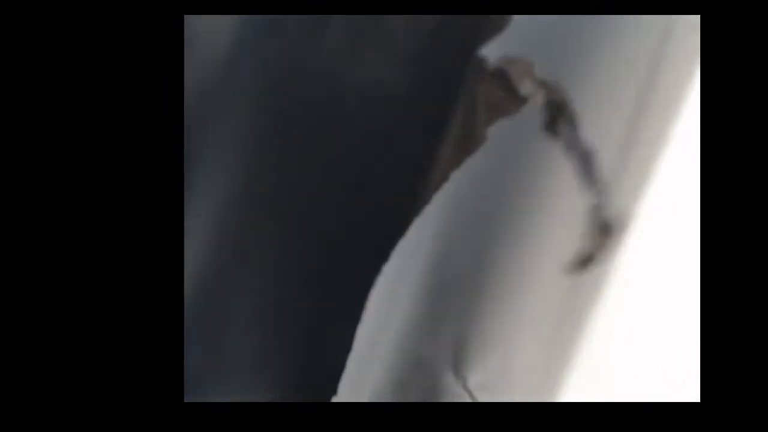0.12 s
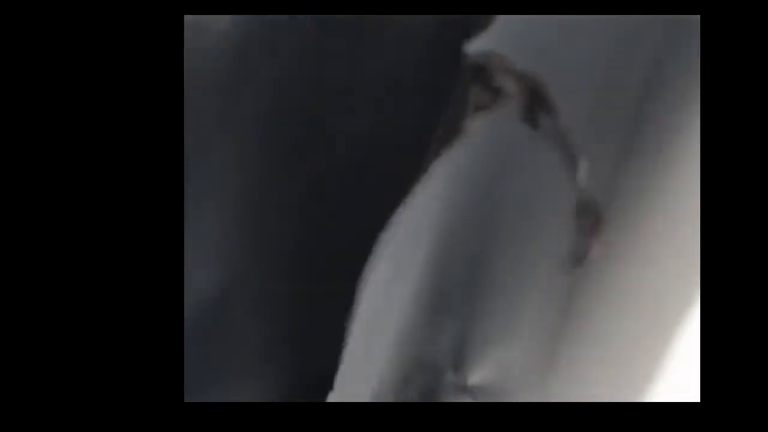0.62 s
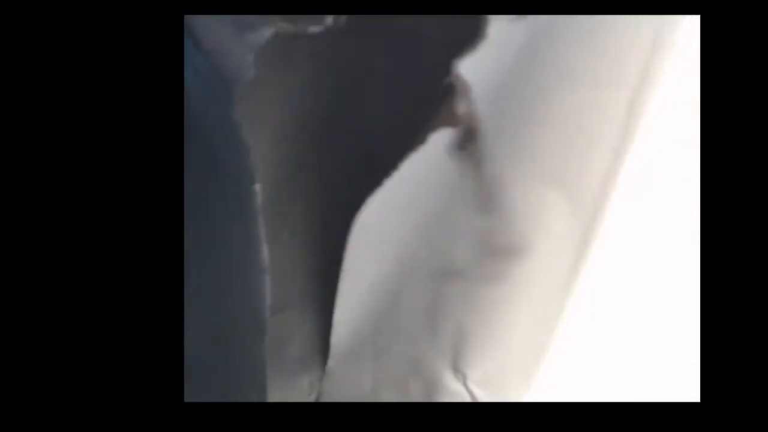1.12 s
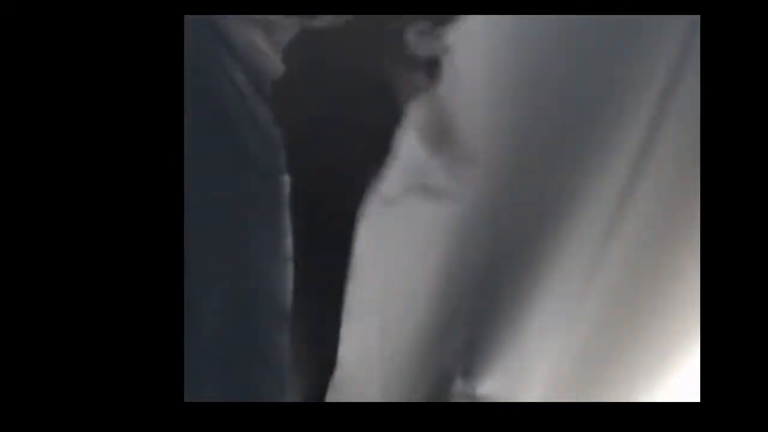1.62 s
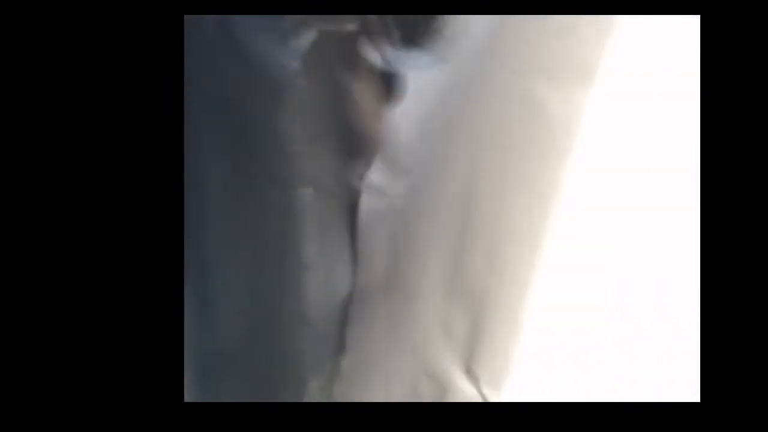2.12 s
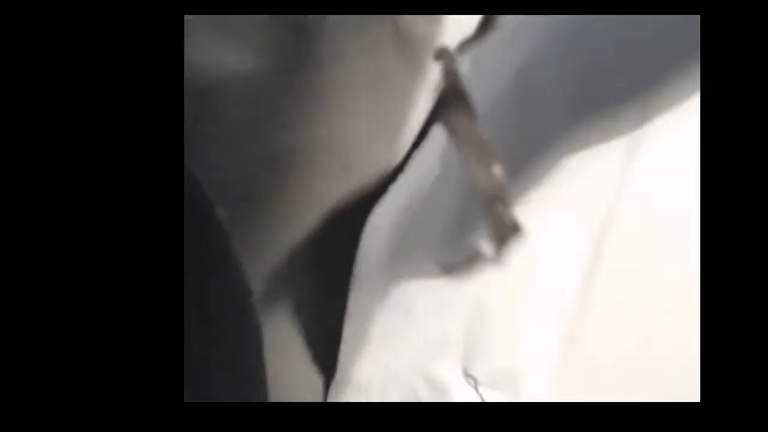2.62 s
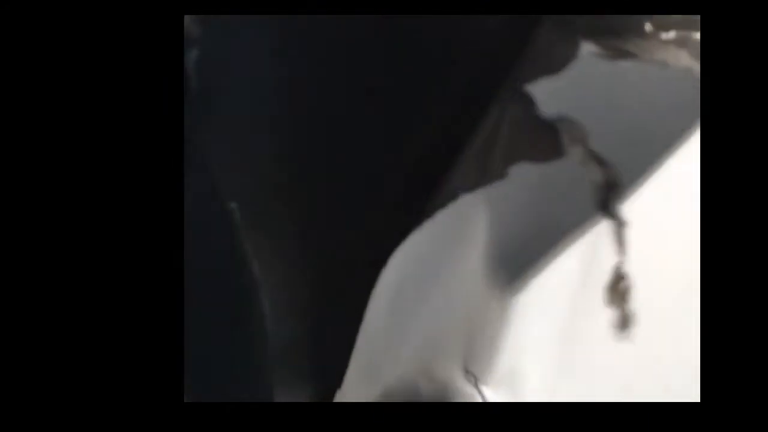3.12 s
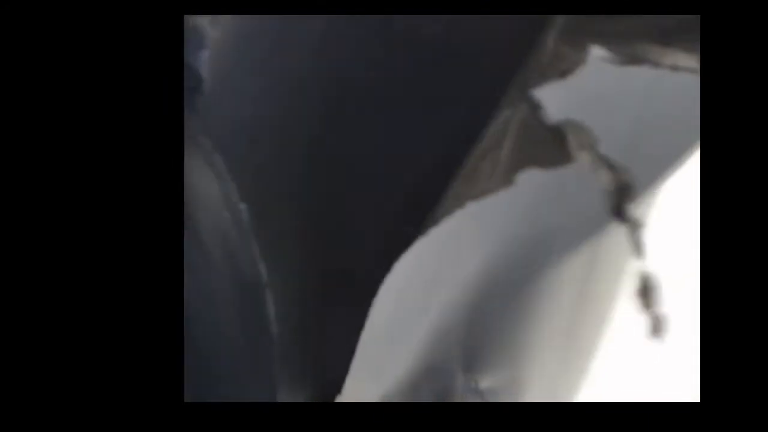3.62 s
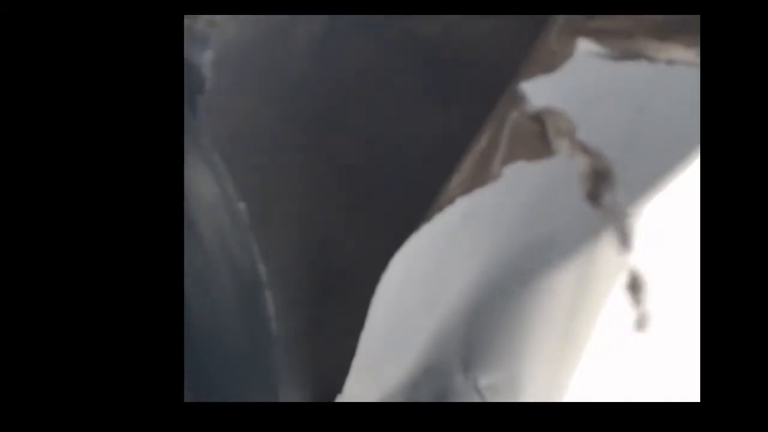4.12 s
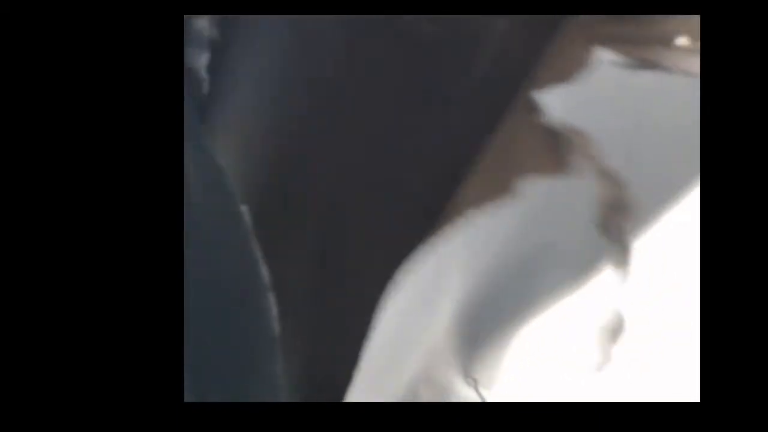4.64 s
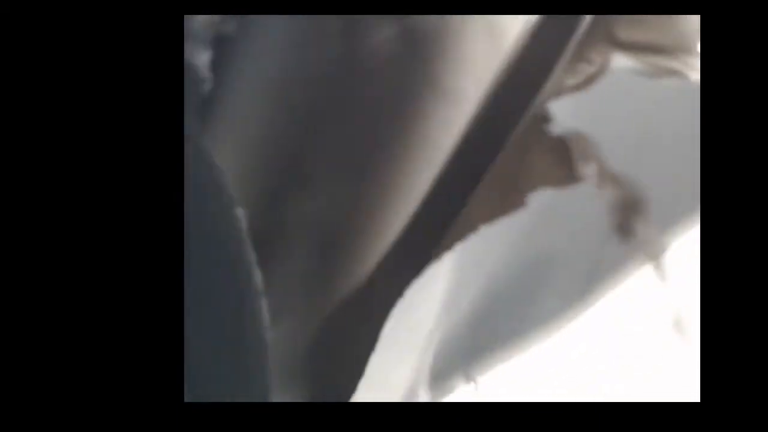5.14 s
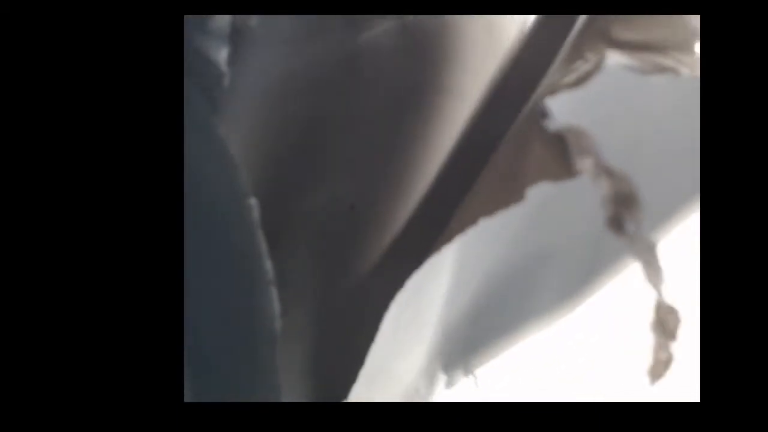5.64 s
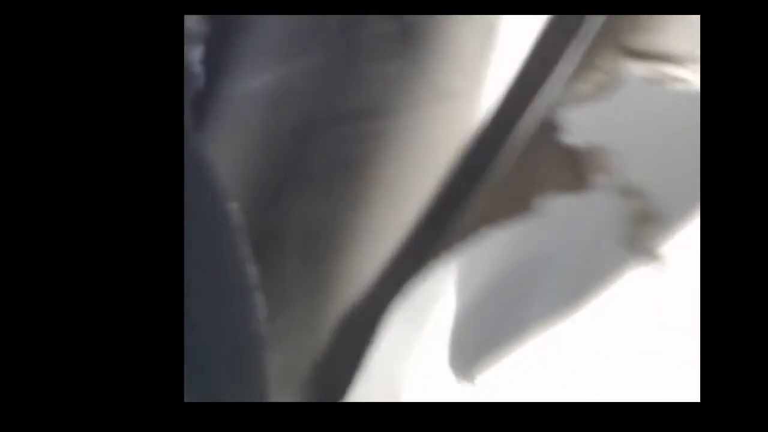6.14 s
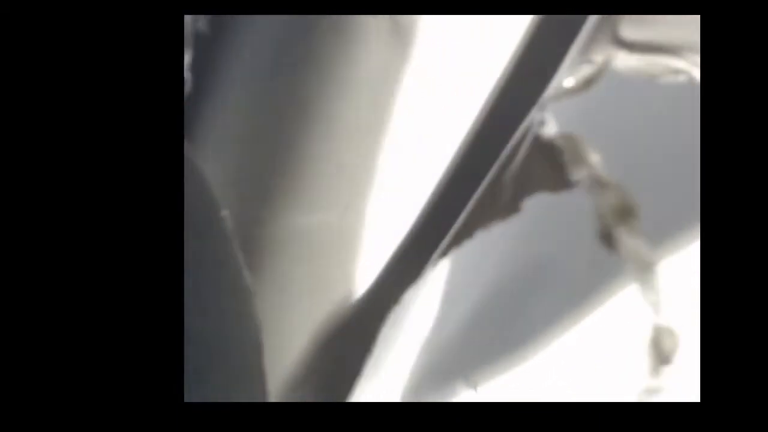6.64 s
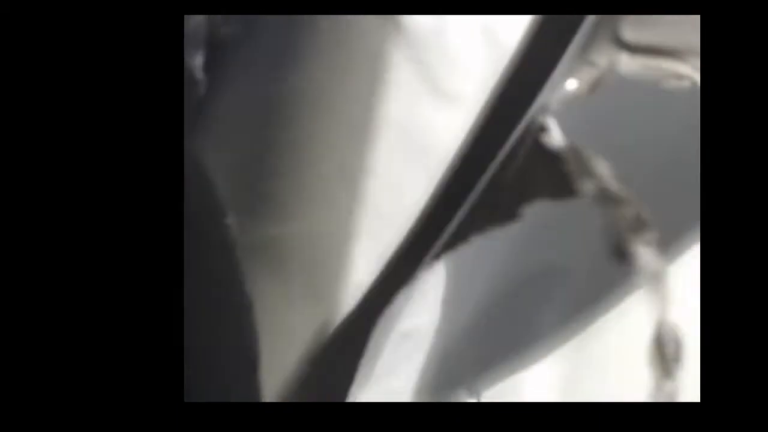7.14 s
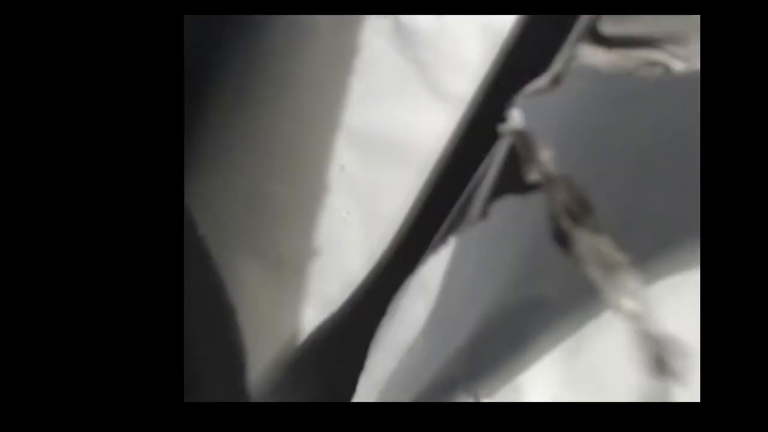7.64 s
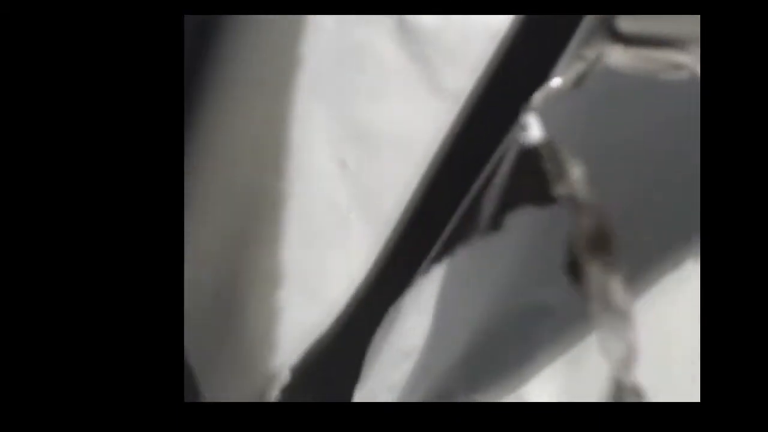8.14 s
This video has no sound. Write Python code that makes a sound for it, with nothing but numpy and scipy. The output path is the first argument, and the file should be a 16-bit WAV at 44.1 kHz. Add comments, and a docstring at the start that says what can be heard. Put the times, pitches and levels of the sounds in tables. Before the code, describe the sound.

A stiff paper parcel is ripped and crumpled up close, two violent cracking bursts, a near-quiet lull, then dense irregular crackles and hollow knocks.

```python
"""In a small room, hands tear and crumple a paper parcel, with a stereo microphone right at its opening.
Creases snap: each jolts the hollow parcel into a ringing boom and knock, and its fibres crack in the treble.
Many tiny snaps and a rub of sheet on sheet follow the grip of the hands.
Moving sheets and bumps push air at the microphone's two ports, and sparse fading taps make the echo.
The microphone dulls the top treble, and its input bends and cuts the loudest peaks."""
import sys
import numpy as np
from scipy import signal
from scipy.fft import rfft, irfft, next_fast_len
from scipy.io import wavfile
from scipy.ndimage import uniform_filter1d

SR = 44100
rng = np.random.default_rng(int(sys.argv[2]) if len(sys.argv) > 2 else 0)


def wav_out(sig):
    """Save sig, one row per channel (or a flat mono array), as 16-bit PCM at SR to the path in sys.argv[1]."""
    wavfile.write(sys.argv[1], SR, np.round(np.clip(np.atleast_2d(sig).T, -1, 1) * 32767).astype(np.int16))


def decibels_to_gain(level_db):
    """Convert a level in decibels to a linear amplitude gain (20 dB per decade)."""
    exponent = np.asarray(level_db, float) / 20
    return 10 ** exponent


N = 364266
RING_N = 2600  # samples kept of one snap or bump

# low ringing modes of the hollow parcel, before each crease retunes them: f/Hz, level/dB, time to fall 60 dB/s
BOOM = [(249, -3, 0.069), (314.5, 3.5, 0.022), (417, -13, 0.031)]
# higher ringing modes of the hollow parcel, before retuning: f/Hz, level/dB, time to fall 60 dB/s
KNOCK = [(480, -28.5, 0.0053), (853, -4, 0.014), (1005, 5.5, 0.015), (1736, 1.5, 0.012)]
# treble colour of breaking and rubbing paper fibres: f/Hz, level/dB
FIZZ = [(1500, -41), (2500, 2), (3200, -1), (4500, -3), (7200, -6)]


def evened(x):
    """Brings a signal to an average (rms) strength of 1."""
    return x / np.sqrt(np.mean(x ** 2) + 1e-20)


def read_curve(points, hz):
    """Reads a curve between its points, with frequency on a logarithmic scale."""
    f, value = np.transpose(points)
    return np.interp(np.log(hz + 1), np.log(f + 1), value)


def add_at(mix, s, sound):
    """Adds a sound to the mix from s seconds on, cut off at the end of the mix."""
    part = mix[:, round(s * SR):][:, :sound.shape[1]]
    part += sound[:, :part.shape[1]]


def coloured(x, points):
    """Filters each channel by a spectrum in dB."""
    n = x.shape[-1]
    size = next_fast_len(n)
    gain = decibels_to_gain(read_curve(points, np.fft.rfftfreq(size, 1 / SR)))
    return irfft(rfft(x, size) * gain, size)[..., :n]


def two_port_noise(same, size):
    """Noise for the two ports, alike by the share same (0 unrelated, 1 identical)."""
    a, b = rng.standard_normal((2, size))
    return np.array([a, same * a + np.sqrt(1 - same ** 2) * b])


def wander(depth_db, size):
    """A gain that drifts at random: noise smoothed over size samples, taken as dB."""
    return decibels_to_gain(depth_db * evened(uniform_filter1d(rng.standard_normal(N), size)))


def fading(t60, rise_s):
    """A quick rise, then a fall of 60 dB in t60 seconds."""
    t = np.arange(RING_N) / SR
    return decibels_to_gain(-60 * t / t60) * (1 - np.exp(-t / rise_s))


def swells(rows, floor, steep=1):
    """Gain of peaks that rise and fall evenly in dB, summed in power over a floor of (s, dB) points."""
    slope_db = 20  # rise and fall times count over this many dB when steep is 1
    t = np.arange(0, N / SR + .002, .001)  # one step a millisecond
    s, db, rise, fall = np.transpose(rows)[:, :, None]
    before = (s - t) / np.maximum(rise, .005)
    after = (t - s) / np.maximum(fall, .005)
    away = np.where(t < s, before, after)
    peaks = (decibels_to_gain(db - steep * slope_db * away) ** 2).sum(0)
    floor_db = np.interp(t, *np.transpose(floor))
    return np.interp(np.arange(N) / SR, t, np.sqrt(peaks + decibels_to_gain(floor_db) ** 2))


def room(x):
    """The small room: sparse taps of random sign, each band dying at its own speed."""
    # how long the echo lasts: f/Hz, time to fall 60 dB/s
    echo_times = [(250, 0.053), (1000, 0.11), (5000, 0.095)]
    taps = np.zeros((2, SR // 2))
    at = np.arange(120, SR // 2 - 20, 20)  # one tap in every 20 samples
    shape = (2, len(at))
    np.put_along_axis(taps, at + rng.integers(0, 20, shape), rng.choice([-1., 1.], shape), 1)
    hz, t, z = signal.stft(taps, SR, nperseg=256)
    fade = decibels_to_gain(-60 * t / read_curve(echo_times, hz)[:, None])
    tail = signal.istft(z * fade, SR, nperseg=256)[1]
    return signal.fftconvolve(x, tail / np.linalg.norm(tail[0]), axes=1)[:, :N]


def air():
    """Lumpy low pressure from sheets flexing by the ports, partly unrelated between them."""
    # colour of the pushed air: f/Hz, level/dB
    air_colour = [(15, 8.5), (40, 4), (220, -4.5), (400, -15), (700, -30.5)]
    # sheets flexing by the ports: peak t/s, pushed air level/dB, rise/s, fall/s
    puffs = [(.11, -35.5, 0.12, 0.1), (.619, -16.5, 0.11, 0.11), (1.636, -25.5, 0.19, 0.094),
             (1.836, -25.5, 0.06, 0.091), (2.12, -28.5, .07, 0.12), (2.584, -41.5, 0.13, 0.071),
             (3.557, -41.5, .6, 0.39), (4.465, -43.5, 0.038, 0.047), (4.92, -43, 1.4, 0.52),
             (5.647, -44.5, 0.2, 0.13), (5.892, -33, 0.1, 0.22), (6.54, -55, 0.13, .08),
             (6.695, -26, 0.018, 0.21), (7.468, -34.5, 1.65, 0.076), (7.608, -35, .05, 0.057),
             (7.712, -32, 0.066, 0.25), (8.087, -30, 0.11, 0.089), (8.256, -12.5, 0.011, 0.04)]
    still_air_db = -50
    lumps = wander(2.5, 1500)
    push = coloured(two_port_noise(.45, N), air_colour)
    return swells(puffs, [(0, still_air_db)]) * evened(push * lumps)


def bumps():
    """Hands bump the parcel: each bump sucks the air and lets it swing back, alike at both ports."""
    # bumps of the hands: t/s, peak level/dB
    bump_rows = [(0.698, -22), (1.775, -18), (1.83, -17), (1.845, -20), (1.856, -19), (2.063, -28),
                 (2.114, -19.5)]
    bump_hz, bump_t60_s = 139, 0.025
    out, t = np.zeros((2, N)), np.arange(RING_N) / SR
    push = -np.sin(2 * np.pi * bump_hz * t) * fading(bump_t60_s, 0.0014)
    push /= abs(push).max()
    for s, peak_db in bump_rows:
        add_at(out, s, decibels_to_gain(peak_db) * push[None])
    return out


def parcel(modes, spread):
    """The ring of the hollow parcel; every crease detunes and weights the modes in its own way."""
    t = np.arange(RING_N) / SR
    hz, db, t60 = np.transpose(modes)[:, :, None]
    tune, weight = rng.standard_normal((2, len(modes), 1))
    hz = hz * np.exp(spread * tune)
    db = db + 3.0 * weight
    return (decibels_to_gain(db - 60 * t / t60) * np.sin(2 * np.pi * hz * t)).sum(0)


def ring(modes, spread, t60, same):
    """A crease gives way in a ragged jolt a few milliseconds long that drives the parcel; peak 1."""
    jolt = two_port_noise(same, RING_N) * fading(t60, 0.00049)
    jolt -= uniform_filter1d(jolt, size=300, axis=1, mode="constant")  # no net push, so no deep bass
    sound = signal.fftconvolve(jolt, parcel(modes, spread)[None], axes=1)[:, :RING_N]
    return sound / abs(sound).max()


def crack(t60, same):
    """The fibres giving way: a short treble burst with its own colour, differing at the two ports; peak 1."""
    own_colour = [(hz, db + 3.0 * rng.standard_normal()) for hz, db in FIZZ]
    burst = coloured(two_port_noise(same, RING_N), own_colour) * fading(t60, 0.000081)
    return burst / abs(burst).max()


def grip(treble):
    """Level of the crumpling, or of its treble: squeezes over the steady hold."""
    # rips and squeezes: peak t/s, crumpling level/dB, rise/s, fall/s, treble over the crumpling/dB
    squeezes = [(0.116, -27, 0.063, 0.075, -0.5), (0.501, -19.5, 0.066, 0.2, -7),
                (0.62, -16.5, .2, 0.11, 1.5), (1.457, -32.5, 0.032, 0.55, 6),
                (1.621, -15, 0.035, 0.044, -0.5), (1.775, -38.5, 0.78, 0.18, -28),
                (2.172, -39.5, 1, 0.85, -2), (2.849, -44, 0.12, 0.41, 1), (4.013, -37.5, 0.29, 0.095, -1),
                (4.28, -36.5, 0.098, 0.057, 1.5), (4.454, -34.5, 0.13, 0.14, 2),
                (4.61, -37, .15, 0.23, 0.5), (5.078, -39, 1, 0.091, -4.5), (5.373, -44, 0.17, 0.44, -3),
                (5.656, -24, 0.079, 0.095, -6.5), (5.902, -30, 0.086, 0.083, -2),
                (6.008, -30.5, 0.051, 0.1, 2), (6.321, -36, 0.1, 0.091, 0.5),
                (6.464, -27.5, 0.013, 0.031, -4), (6.55, -31.5, 0.048, 0.04, -7),
                (6.687, -25, 0.095, 0.16, -4), (7.244, -33, 0.23, 0.058, -3),
                (7.355, -23.5, 0.052, .21, -5.5), (7.715, -22, 0.012, 0.064, -5.5),
                (7.872, -28.5, 0.15, 0.084, -0.5), (8.256, -27, 0.42, .11, -1.7)]
    # the parcel held between squeezes: t/s, rustle level/dB, treble over the rustle/dB
    hold = [(0, -48.5, -2), (.4, -57, -6), (.85, -49.5, -5.5), (1.08, -54, 0), (1.14, -77, 3.5),
            (1.432, -58, 6.5), (2.66, -54, -22), (3.45, -45.5, -8.5), (3.79, -54, -14), (5.25, -50, -7.5),
            (5.5, -41, -4), (6.14, -51.5, -15.5), (6.6, -48.5, 0), (6.85, -41.5, -5), (6.98, -43.5, -11),
            (7.04, -48, 2), (7.65, -45.5, -7), (8.26, -58.5, -7)]
    rows = [(s, db + treble * bright_db, rise, fall) for s, db, rise, fall, bright_db in squeezes]
    floor = [(s, db + treble * bright_db) for s, db, bright_db in hold]
    return swells(rows, floor, steep=1.33 if treble else 1)  # the treble rises and falls faster


def hail(per_s, spread_db, count):
    """Trains of clicks in clumps, mostly small, now and then large; a harder grip makes them denser."""
    denser = np.clip(grip(treble=False) / decibels_to_gain(-40), 1, 300) ** .5
    clumps = wander(5.5, 900)
    size = decibels_to_gain(spread_db * np.minimum(rng.exponential(1, N), 3.1)) / np.sqrt(denser)
    size *= rng.random(N) < per_s * denser * clumps / SR
    which = rng.integers(0, count, N)  # every click belongs to one of the trains
    return [(size * (which == k))[None] for k in range(count)]


def stick_and_slide():
    """The sheets stick and slide: a gain that wanders within tens of milliseconds."""
    return wander(3.5, 1200)


def patch_turn():
    """One patch of paper comes and goes over a few tenths of a second."""
    smooth = uniform_filter1d(rng.standard_normal(N), size=6000)
    return decibels_to_gain(5.4 * evened(uniform_filter1d(smooth, size=6000)))


def rub_patch(modes):
    """Sheets rubbing in one patch: noise that sticks and slides, ringing the parcel."""
    noise = signal.oaconvolve(two_port_noise(1.0, N), parcel(modes, 0.04)[None], axes=1)[:, :N]
    return stick_and_slide() * patch_turn() * noise


def crumpling():
    """Tiny snaps over the rub of sheet on sheet; low and treble parts follow the grip."""
    damped = 0.95  # share of the ring time left while the sheets rub
    damped_knock = [(hz, db, damped * t60) for hz, db, t60 in KNOCK]
    damped_boom = [(hz, db, damped * t60) for hz, db, t60 in BOOM]
    knocks, cracks = np.zeros((2, 2, N))
    for clicks in hail(340, 5.85, count=14):
        body = ring(damped_knock, 0.19, 0.0042, 0.85)
        body += 0.23 * ring(BOOM, 0.14, 0.035, 1.0)
        knocks += signal.oaconvolve(clicks, body, axes=1)[:, :N]
        crack_gain = decibels_to_gain(2.5 * rng.standard_normal())
        cracks += crack_gain * signal.oaconvolve(clicks, crack(0.015, 0.083), axes=1)[:, :N]
    # several patches of paper rub by turns, so the colour drifts
    rub = sum(rub_patch(damped_knock + damped_boom) for _ in range(5))
    hiss = stick_and_slide() * coloured(two_port_noise(.2, N), FIZZ)
    low = 0.63 * evened(knocks) + 0.5 * evened(rub)
    high = 0.69 * evened(cracks) + 0.41 * evened(hiss)
    return grip(treble=False) * low + grip(treble=True) * high


def snaps():
    """Each clear snap of a crease is a boom, a knock and a crack at once."""
    # the clear snaps: t/s, knock peak level/dB, boom peak level/dB, crack peak level/dB
    snap_rows = [(0.102, -13, -11.5, -3.5), (0.221, -34, -40, -29.5), (0.236, -27.5, -35, -20),
                 (0.416, -32, -45, -36), (0.489, -11, -26, -10), (0.511, -9.5, -33, -6.5),
                 (0.543, -9, -39, -47), (0.561, -13, -20, -13.5), (0.575, -11.5, -19.5, 1),
                 (0.585, -10, -8, -5), (0.617, 5, -18.5, -19), (0.627, -4, -21, 3.5), (0.67, -10, -48, 2.5),
                 (0.686, -17, -22.5, -3.5), (1.548, -15.5, -26, -9.5), (1.558, -13, -12.5, -9.5),
                 (1.61, -21.5, -18.5, -3.5), (1.626, -3, -18.5, -10), (1.701, -20, -30, -21),
                 (1.831, -17, -26, -18), (2.045, -23, -53, -20), (2.113, -25, -46, -40),
                 (2.168, -15.5, -48, -14.5), (3.237, -28, -37, -22.5), (3.342, -25, -28.5, -36),
                 (3.616, -23, -25.5, -61), (3.83, -28, -33, -17), (3.913, -58.5, -47, -16),
                 (4.194, -32.5, -40, -19), (4.277, -16, -49, -19), (4.378, -16.5, -56, -24),
                 (4.457, -17.5, -34, -14.5), (4.493, -20, -29, -32), (4.594, -20.5, -29, -12),
                 (4.755, -21.5, -49, -72), (4.963, -12.5, -25, -8), (5.057, -17.5, -60, -26),
                 (5.088, -23, -54, -7.5), (5.169, -26, -44, -23.5), (5.394, -14, -54, -7.5),
                 (5.43, -20.5, -28.5, -23), (5.504, -24.5, -25.5, -27.5), (5.612, -12.5, -15, -19),
                 (5.652, -9.5, -20, -13), (5.665, -19, -50, -17), (5.761, -27, -37, -23),
                 (5.829, -14.5, -22, -16), (5.863, -14, -25.5, -20.5), (5.881, -7, -38, -7.5),
                 (5.887, -3, -40, -7), (5.924, -4.5, -33.5, -6.5), (5.994, -1, -19, -2.5),
                 (6.261, -20, -24, -56), (6.39, -22.5, -41, -48), (6.535, -15.5, -21, -14),
                 (6.632, -16, -61, -12.5), (6.6603, -3, -1, -5.5), (6.6904, -7, -14, -1.5),
                 (6.699, -7.5, -3, -1), (6.723, -12.5, -22, -15), (6.748, -18, -15, -13.5),
                 (6.82, -29, -27, -17.5), (6.899, -26.5, -31, -19.5), (7.076, -18.5, -63, -13),
                 (7.187, -20, -20, -24), (7.248, -11.5, -19.5, -11.5), (7.333, -15.5, -17.5, -8.5),
                 (7.348, -13, -33, -7), (7.406, -13.5, -21, -6.5), (7.414, -9.5, -13, -6.5),
                 (7.428, -18, -40, -6), (7.447, -11, -21, -40), (7.467, -8.5, -13, -4),
                 (7.602, -17.5, -16, -20), (7.664, -20, -49, -61.5), (7.7, -5, -16.5, -3.5),
                 (7.731, -12.5, -25, -27), (7.989, -24, -45, -10.5), (8.025, -21.5, -47, -13),
                 (8.06, -19.5, -43, -12), (8.078, -11, -21, -11.5), (8.089, -16, -20, -14),
                 (8.124, -23.5, -16, -9.5), (8.175, -15, -20.5, -38), (8.254, -16.5, -44, 0.5)]
    stiffen = 0.33  # a harder boom tightens the walls: share of pitch gained by a boom of 0 dB
    out = np.zeros((2, N))
    for s, knock_db, boom_db, crack_db in snap_rows:
        tight = [(hz * (1 + stiffen * decibels_to_gain(boom_db)), db, t60) for hz, db, t60 in BOOM]
        boom = decibels_to_gain(boom_db) * ring(tight, 0.11, 0.011, 0.9)
        knock = decibels_to_gain(knock_db) * ring(KNOCK, 0.07, 0.01, 0.77)
        add_at(out, s, boom + knock + decibels_to_gain(crack_db) * crack(0.016, 0.1))
    return out


def scene():
    """Paper, its echo, pushed air and bumps, all stronger at the left port."""
    paper = snaps() + crumpling()
    paper[0] = np.roll(paper[0], 2)  # the left port hears it two samples later
    echo = decibels_to_gain(-11) * room(paper)
    return (paper + echo + air() + bumps()) * decibels_to_gain([[2.2], [-2.2]])  # left, right in dB


def roll_off(x):
    """The treble ends steeply here."""
    return signal.sosfilt(signal.butter(12, 16560, fs=SR, output="sos"), x)


def record(dry):
    """The microphone rolls off its treble, then the input overloads and cuts the peaks flat."""
    # treble response of the microphone: f/Hz, level/dB
    mic_edge = [(7200, 4), (8000, -8), (9000, -25), (10500, -44), (16000, -37)]
    x = coloured(dry, mic_edge)
    bent = x - 0.08 * np.clip(x, -2, 2) ** 3  # loud peaks bend, which spreads them into the top octave
    return roll_off(np.clip(bent, -1, 1))


dry = scene()
out = record(dry)
wav_out(out)
```